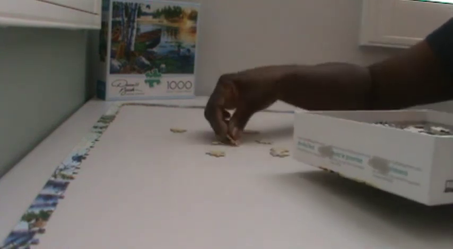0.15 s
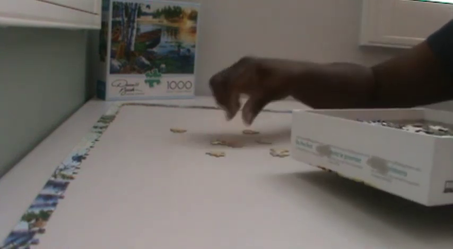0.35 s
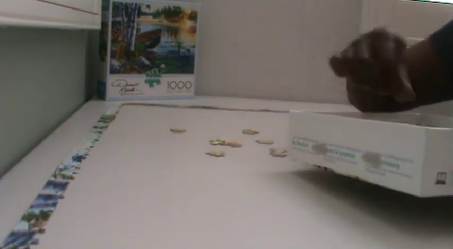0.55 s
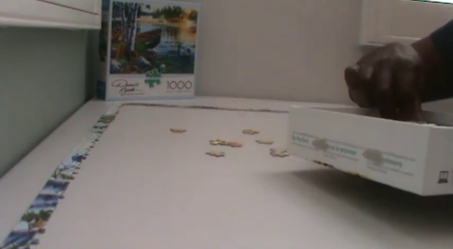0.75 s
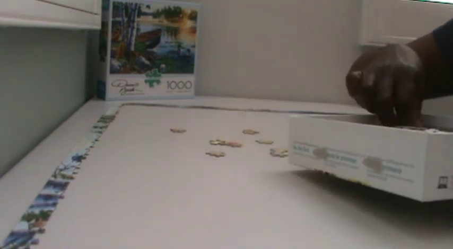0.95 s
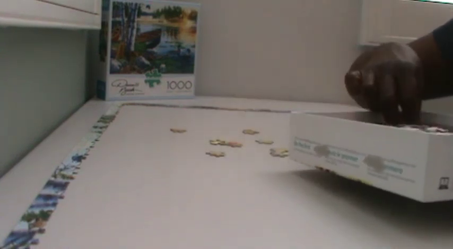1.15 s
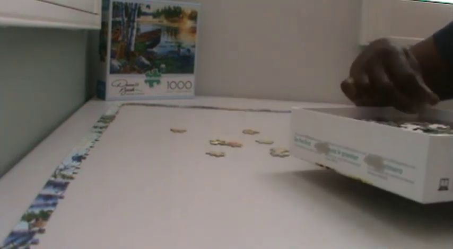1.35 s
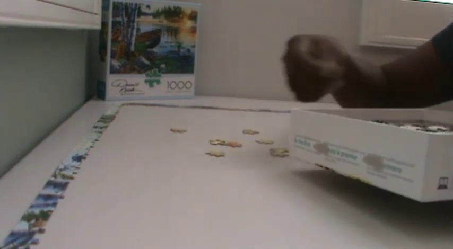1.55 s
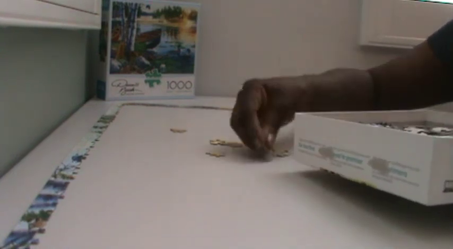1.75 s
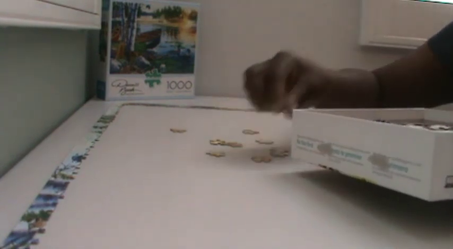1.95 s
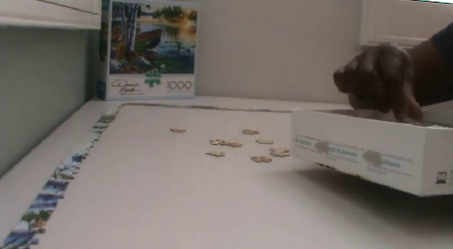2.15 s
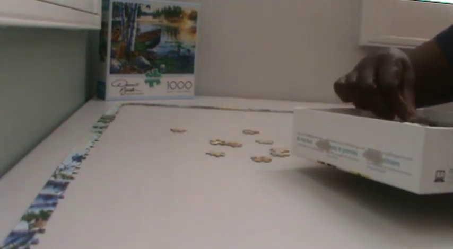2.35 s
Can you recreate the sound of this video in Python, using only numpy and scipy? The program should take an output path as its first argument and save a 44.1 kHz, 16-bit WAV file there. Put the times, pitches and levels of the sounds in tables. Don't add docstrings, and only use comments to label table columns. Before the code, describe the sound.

A cardboard jigsaw piece snaps sharply onto a hard counter, then pieces rustle in a box

```python
import sys
import numpy as np
from scipy import signal
from scipy.io import wavfile
from scipy.ndimage import uniform_filter1d

SR = 44100
rng = np.random.default_rng(int(sys.argv[2]) if len(sys.argv) > 2 else 0)


def to_linear_factor(level_db):
    exponent = np.asarray(level_db, float) / 20
    return 10 ** exponent


def bounce(signal):
    frames = np.transpose(np.atleast_2d(signal))
    limited = np.clip(frames, -1, 1)
    pcm = np.round(limited * 32767).astype(np.int16)
    wavfile.write(sys.argv[1], SR, pcm)


N = 105840

# frequency in Hz, level in dB.
HUSH_COLOUR = [(15, -72), (25, -51), (48, -9.5), (180, -10.5), (242, -8.5), (427, -13), (560, -12),
               (1400, -25), (5000, -26), (16000, -31)]
# frequency in Hz, left-right likeness from -1 to 1.
HUSH_LIKENESS = [(60, 0.94), (130, 0.82), (290, 0.46), (640, -0.95), (1410, 1), (3100, -0.16), (6820, 0.41),
                 (15000, 1.0)]
# time in seconds, level in dB.
DRAG_LEVEL = [(.215, -74), (.225, -42.5), (.265, -36.5), (.31, -44.5), (.33, -62), (1.85, -71.5),
              (1.865, -36.5), (1.91, -45), (1.93, -80)]
# frequency in Hz, level in dB.
DRAG_SPECTRUM = [(60, -32), (120, -6), (250, 3.5), (420, 2), (800, -14.5), (2000, -13.5), (3200, -20),
                 (5000, -29.5), (7700, -25.5), (10000, -34.5), (16000, -47)]
# start in seconds, level in dB, brightness in dB per octave, T60 in seconds.
EDGE_CRACKS = [
    (0.2175, -30, -4, 0.034),
    (0.3216, -30.5, -1, 0.02),
    (.3288, -10, -0.5, 0.0089),
    (1.353, -46.5, 3.5, 0.027),
    (1.9075, -31, -6, 0.018),
    (1.9162, -11, 1, 0.0075),
]
# frequency in Hz, level in dB.
CRACK_SPECTRUM = [(300, -26.5), (1000, -12), (1700, -6), (2400, -3.5), (4700, -16.5), (6200, -14.5),
                  (9500, -17), (13000, -22), (16800, -28)]
# frequency in Hz, level in dB, T60 in seconds.
CARD_MODES = [(2950, -8, .02), (4040, -9.5, .02), (5830, -10, .018), (7100, -14, .016), (9600, -18.5, .01),
              (11800, -25.5, .008)]
# start in seconds, ring level in dB, ring pitch in Hz, thud level in dB.
COUNTER_TAPS = [
    (0.218, -12, 2262, -25.5),
    (0.263, -31, 3040, -46),
    (0.277, -48, 1950, -26),
    (0.2967, -27, 2160, -24),
    (0.3031, -30.5, 1920, -29.5),
    (0.3218, -22, 3260, -17),
    (0.3286, -8, 2228, -16),
    (1.856, -21.5, 2267, -28),
    (1.9106, -19.5, 2440, -34),
    (1.9165, -35, 1600, -17),
]
# ratio to the ring pitch, level in dB.
RING_OVERTONES = [(0.762, -2.5), (1.33, -6)]
# frequency in Hz, level in dB, T60 in seconds.
COUNTER_MODES = [(57, -19, 0.5), (73.8, -13.5, 0.62), (90.6, -6.5, 0.43), (132.5, -15.5, 0.64),
                 (162.4, 0, 0.136), (197.4, -2.5, 0.23), (216, -5.5, 0.23), (247, -7, 0.21),
                 (370, 2, 0.083), (454, -1.5, 0.19), (553, 10, 0.048), (639.3, -4.5, 0.22)]
PANEL_MODES = [1932, 2010, 2045, 2066, 2100]
# start in seconds, level in dB, pitch in Hz, length in seconds.
EDGE_TICKS = [(.2183, -37, 7400, .004), (.2185, -34, 3700, .005), (1.8565, -42, 650, .03),
              (1.05, -54, 9400, .015), (1.062, -53, 7200, .015), (.7595, -44, 9200, .02),
              (.7595, -49, 5500, .015), (1.15, -44, 480, .03), (1.2265, -44, 500, .015),
              (1.407, -48, 2300, .008), (1.616, -56, 11200, .015), (1.04, -57, 11500, .01),
              (1.26, -56, 8900, .05), (1.287, -53, 8700, .04), (.772, -45, 4050, .008),
              (.801, -48, 8300, .005), (1.2145, -47, 8300, .006), (1.2275, -44, 3100, .004),
              (1.3522, -39, 8500, .008), (1.4052, -46, 7800, .007), (1.615, -53, 9300, .025),
              (1.616, -56, 7500, .02), (1.66, -63, 10000, .08), (2.27, -57, 9500, .05),
              (2.272, -58, 8000, .04), (2.278, -51, 1550, .02)]
# frequency in Hz, T60 in seconds.
ROOM_T60 = [(60, 0.39), (200, 0.49), (600, 0.49), (2100, 0.61), (5000, 0.53), (9000, .4), (14000, 0.3)]
# frequency in Hz, level in dB.
ROOM_SPECTRUM = [(100, 8.5), (500, -3.5), (900, 6.5), (1800, -1), (2080, 3), (2400, -4), (5000, 5.5),
                 (12000, -8), (15500, -19)]
# frequency in Hz, left-right likeness from -1 to 1.
ROOM_LIKENESS = [(100, 0.91), (300, 0.94), (600, -0.17), (2000, 0.036), (6000, 0.21), (12000, 0.75)]
# delay in seconds, level in dB.
EARLY_ECHOES = [(.0036, 1), (.0062, -6), (.0085, -9), (.0125, -11.5), (.017, -12.5), (.023, -15.5)]
# time in seconds, shuffle level in dB, finger rub level in dB.
STIR_LEVELS = [(.75, -84, -67), (.762, -36.5, -45.5), (.785, -51.5, -66), (.845, -50, -52.5),
               (.89, -64.5, -70), (.945, -52, -61), (.99, -58.5, -67), (1.05, -57.5, -55.5),
               (1.08, -55.5, -62), (1.11, -57, -73), (1.148, -43, -49.5), (1.19, -70.5, -75),
               (1.25, -63.5, -66), (1.29, -58.5, -62), (1.33, -58, -62), (1.365, -54.5, -86),
               (1.42, -72.5, -59), (1.46, -77, -86)]
# start in seconds, peak level in dB, ring pitch in Hz.
BOX_KNOCKS = [(0.7597, -29.5, 1420), (0.763, -34, 1450), (0.768, -38, 1560), (.774, -40, 1405),
              (0.782, -51, 1280), (0.8006, -33.5, 1440), (0.803, -61, 1160), (0.815, -43, 1390),
              (0.8186, -33.5, 1430), (0.822, -40, 1510), (.840, -41, 1320), (0.843, -33, 1470),
              (0.856, -36, 1420), (0.928, -47.5, 1460), (0.937, -44.5, 1240), (.945, -51, 1540),
              (0.9998, -45.5, 1400), (0.965, -42, 1470), (1.0216, -39.5, 1470), (1.0604, -43.5, 1180),
              (1.063, -40.5, 1500), (1.079, -43, 1760), (1.106, -46, 1490), (1.138, -36, 1490),
              (1.146, -39, 1220), (1.143, -35.5, 1540), (1.151, -30.5, 1470), (1.2028, -41, 1150),
              (1.214, -41, 1920), (1.227, -30.5, 1243), (1.2803, -46, 1560), (1.3568, -36, 1430),
              (1.4063, -41, 1690)]
# frequency in Hz, level in dB, T60 in seconds.
BOX_MODES = [(467, -16, 0.023), (1132, -4, 0.0075), (1430, -4.5, 0.005), (2000, -2, 0.0036),
             (2990, -11.5, 0.01)]
# start in seconds, level in dB, pitch in Hz.
HAND_TURNS = [
    (1.763, -36, 1360),
    (1.828, -40.5, 1350),
]

MODE_SPREAD_DB = 2.5


def evened(x):
    return x / np.sqrt(np.mean(x ** 2) + 1e-20)


def read(points, hz):
    f, value = np.transpose(points)
    return np.interp(np.log(hz + 1), np.log(f + 1), value)


def add(mix, s, sound):
    part = mix[round(s * SR):][:len(sound)]
    part += sound[:len(part)]


def coloured(x, spectrum):
    log_gain = read(spectrum, abs(np.fft.fftfreq(2048, 1 / SR))) * np.log(10) / 20
    taps = np.fft.ifft(np.exp(np.conj(signal.hilbert(log_gain)))).real[:1024]
    return signal.oaconvolve(x, taps / np.linalg.norm(taps))[:len(x)]


def ring(hz, t60, rise_s, size=4410):
    t = np.arange(size) / SR
    swell = 1 - np.exp(-t / rise_s)
    return -swell * to_linear_factor(-60 * t / t60) * np.sin(2 * np.pi * hz * t)


def band(x, hz, width):
    r = np.exp(-np.pi * width / SR)
    a = [1, -2 * r * np.cos(2 * np.pi * hz / SR), r * r]
    once = signal.lfilter([1, 0, -1], a, x)
    return signal.lfilter([1, 0, -1], a, once)


def grit(per_s, spread_db):
    sizes = rng.standard_normal(N) * to_linear_factor(spread_db * np.minimum(rng.exponential(1, N), 4))
    return evened(sizes * (rng.random(N) < per_s / SR))


def curve(rows, column):
    rows = np.array(rows)
    return to_linear_factor(np.interp(np.arange(N) / SR, rows[:, 0], rows[:, column], left=-120, right=-120))


def stereo_pair(a, b, likeness, hz):
    same = np.clip(read(likeness, hz), -1, 1)[:, None]
    return np.array([a, same * a + np.sqrt(1 - same ** 2) * b])


def room_hush():
    frames, hz = N // 256 + 5, np.fft.rfftfreq(1024, 1 / SR)
    a, b, c, d, patches = rng.standard_normal((frames, 513, 5)).T
    patches = uniform_filter1d(patches, size=10, axis=0)
    patches = evened(uniform_filter1d(patches, size=14, axis=1))
    z = stereo_pair(a + 1j * b, c + 1j * d, HUSH_LIKENESS, hz)
    z[:, hz > 16150] = 0
    z *= to_linear_factor(read(HUSH_COLOUR, hz)[:, None] + 0.21 * patches)
    hiss = signal.istft(z, nperseg=1024, noverlap=768)[1][:, :N]
    return to_linear_factor(-58.5) * evened(hiss)


def finger_drag():
    return curve(DRAG_LEVEL, column=1) * evened(coloured(grit(14000, 1.2), DRAG_SPECTRUM))


def edge_cracks():
    direct, send, t = np.zeros(N), np.zeros(N), np.arange(2000) / SR
    onset = t == 0
    for (s, db, tilt_db, t60), puff in zip(EDGE_CRACKS, rng.standard_normal((len(EDGE_CRACKS), 2000))):
        colour = [(f, level + tilt_db * np.log2(f / 2000)) for f, level in CRACK_SPECTRUM]
        burst = (puff - 0.57 * onset) * to_linear_factor(db - 60 * t / t60)
        add(direct, s, coloured(burst, colour))
        for (f, mode_db, mode_t60), detune in zip(CARD_MODES, puff):
            level_db = db + 2.5 + mode_db + tilt_db * np.log2(f / 2000)
            add(direct, s, to_linear_factor(level_db) * ring(f * (1 + 0.0059 * detune), mode_t60, rise_s=.0002))
        add(send, s, coloured(np.linalg.norm(burst) * onset, colour))
    return direct, send


def card_rings():
    out = np.zeros(N)
    for s, ring_db, hz, _ in COUNTER_TAPS:
        for ratio, db in [(0.95, 0.018)] + list(RING_OVERTONES):
            add(out, s, to_linear_factor(ring_db + db) * ring(hz * ratio, t60=0.016, rise_s=0.001))
    return out


def counter_thuds():
    out, modes = np.zeros(N), list(COUNTER_MODES) * 2
    spread = rng.standard_normal((len(COUNTER_TAPS), len(modes)))
    for (s, _, _, thud_db), luck in zip(COUNTER_TAPS, spread):
        for (f, db, t60), loud, detune in zip(modes, luck, luck[::-1]):
            level_db = thud_db - 18.0 + db + MODE_SPREAD_DB * loud
            add(out, s, to_linear_factor(level_db) * ring(f * (1 + 0.026 * detune), t60, rise_s=0.0033, size=35000))
    return out


def panel_hum(ringing):
    panel = sum(ring(hz, t60=0.52, rise_s=.004, size=30000) for hz in PANEL_MODES)
    return to_linear_factor(-61) * signal.fftconvolve(ringing, panel)[:N]


def edge_ticks():
    out = np.zeros(N)
    for s, db, hz, length in EDGE_TICKS:
        u = np.arange(6000) / SR / length
        shape = np.minimum(u * 20, 1) * np.exp(-2.5 * u)
        add(out, s, to_linear_factor(db) * shape * evened(band(rng.standard_normal(6000), hz, .2 * hz)))
    return out


def kitchen(x):
    noise = rng.standard_normal((2, SR)) * np.clip(np.arange(SR) / SR / 0.0018 - .2, 0, 1)
    hz, t, (a, b) = signal.stft(noise, SR, nperseg=512)
    decay_db = read(ROOM_SPECTRUM, hz)[:, None] - 60 * t / read(ROOM_T60, hz)[:, None]
    tail = signal.istft(stereo_pair(a, b, ROOM_LIKENESS, hz) * to_linear_factor(decay_db), SR, nperseg=512)[1]
    tail = tail / np.linalg.norm(tail[0])
    u = np.arange(300) / SR / 0.0013
    for k, (s, db) in enumerate(EARLY_ECHOES):
        echo = np.convolve(np.diff(rng.standard_normal(301)) * u * np.exp(-u), np.hanning(15))
        echo = .45 * echo / np.linalg.norm(echo)
        for ear in (0, 1):
            add(tail[ear], s + 0.00035 * rng.random(), to_linear_factor(db) * (-1) ** k * echo)
    return signal.fftconvolve(x[None, None], tail[:, None], axes=2).sum(1)[:, :N]


def stirred_pieces():
    shuffle = 0
    for hz, db, t60 in BOX_MODES:
        shuffle = shuffle + to_linear_factor(db) * signal.oaconvolve(grit(500, 3), ring(hz, t60, rise_s=0.00033))[:N]
    narrow = sum(evened(band(grit(350, 3.0), 8500 + 2400 * k, 1500)) for k in (-0.4, -0.28, 0.13, -0.14))
    broad = evened(band(grit(3000, 1.2), 4830, 8000))
    rub = evened(evened(narrow) + 1.3 * broad)
    return curve(STIR_LEVELS, column=1) * evened(shuffle) + curve(STIR_LEVELS, column=2) * rub


def box_knocks():
    out, u = np.zeros(N), np.arange(2000) / SR / .0011
    swell = u * np.exp(1 - u)
    noise = rng.standard_normal((len(BOX_KNOCKS), 2000))
    spread = rng.standard_normal((len(BOX_KNOCKS), 2, len(BOX_MODES)))
    for (s, db, hz), puff, (loud, pitch) in zip(BOX_KNOCKS, noise, spread):
        for (f, mode_db, t60), louder, detune in zip(BOX_MODES, loud, pitch):
            wall = ring(f * (1 + 0.071 * detune), t60, rise_s=0.00066)
            add(out, s, to_linear_factor(db + mode_db + MODE_SPREAD_DB * louder) * wall)
        edge = to_linear_factor(-32) * evened(band(puff, 2850, 3900))
        knock = np.sin(2 * np.pi * hz * np.arange(2000) / SR)
        add(out, s, to_linear_factor(db) * swell * (edge - knock))
    return out


def turned_piece():
    out = np.zeros(N)
    for s, db, hz in HAND_TURNS:
        add(out, s, to_linear_factor(db + 6) * ring(hz, t60=0.015, rise_s=0.00033))
    return out


def scene():
    hush = room_hush()
    ringing = finger_drag() + card_rings()
    cracks, crack_send = edge_cracks()
    thud = counter_thuds() + panel_hum(ringing)
    card = edge_ticks() + stirred_pieces() + box_knocks() + turned_piece()
    air = ringing + cracks + card
    late = signal.lfilter([1 - 0.23, 0.23], [1], air)
    direct = np.array([air * to_linear_factor(0.3), late / to_linear_factor(0.3)])
    thud_left = np.interp(np.arange(N) - 0.00036 * SR, np.arange(N), thud)
    wet = to_linear_factor(-1.5) * (.5 * ringing + crack_send + 0.61 * thud) + to_linear_factor(-10.5) * card
    return direct + np.array([thud_left, thud]) + kitchen(wet) + hush


def top_cut(x):
    return signal.sosfilt(signal.butter(12, 16990, fs=SR, output="sos"), x)


def record(dry):
    low_pass = signal.firwin(255, 16800, window=("kaiser", 9), fs=SR)
    finished = signal.oaconvolve(dry, low_pass[None], "same")
    return top_cut(finished)


dry = scene()
out = record(dry)
bounce(out)
```